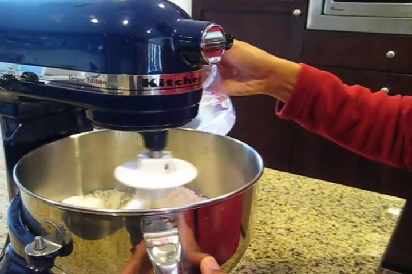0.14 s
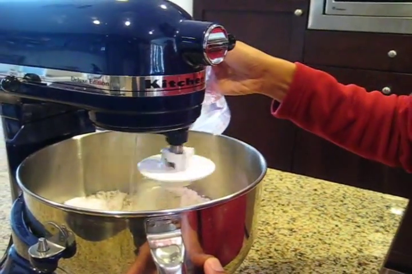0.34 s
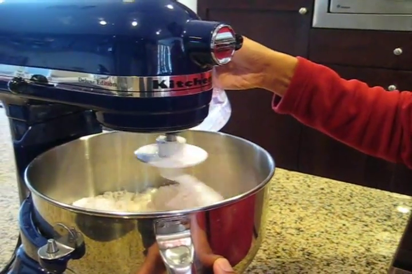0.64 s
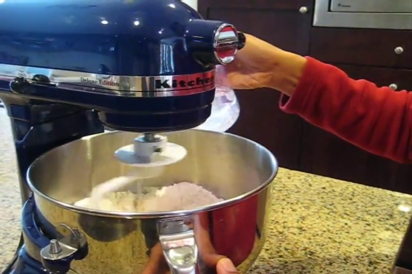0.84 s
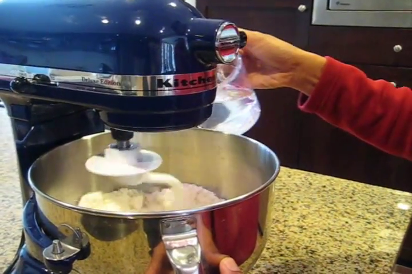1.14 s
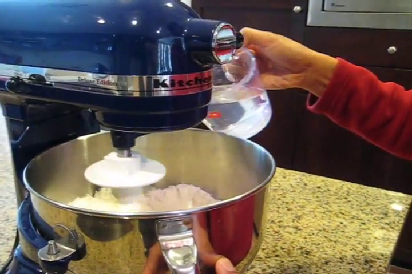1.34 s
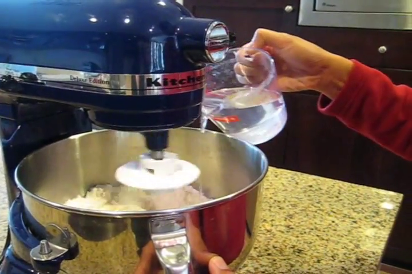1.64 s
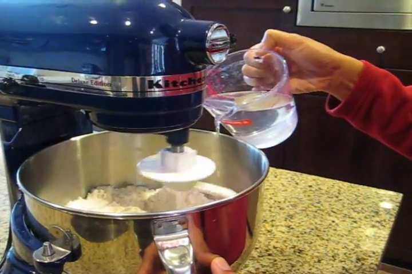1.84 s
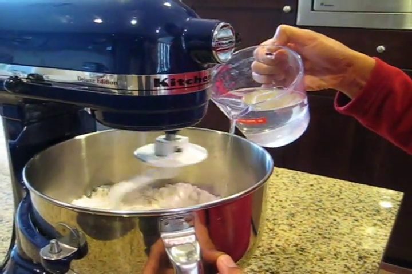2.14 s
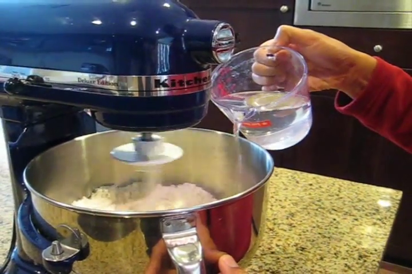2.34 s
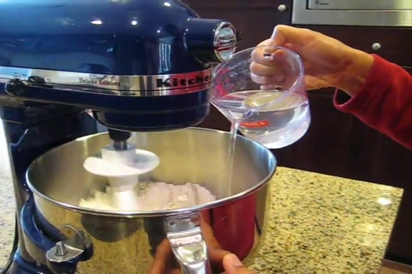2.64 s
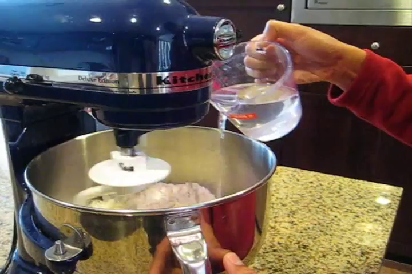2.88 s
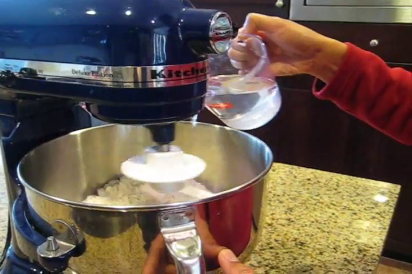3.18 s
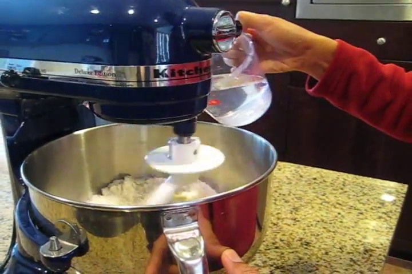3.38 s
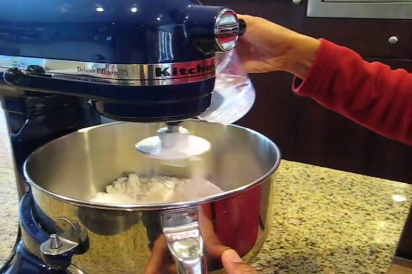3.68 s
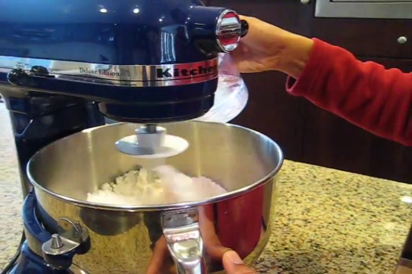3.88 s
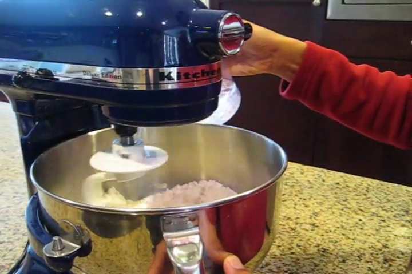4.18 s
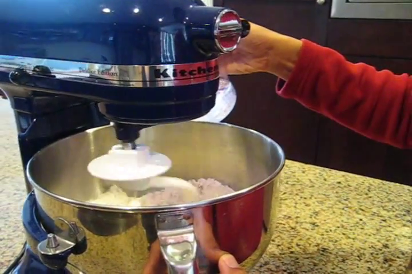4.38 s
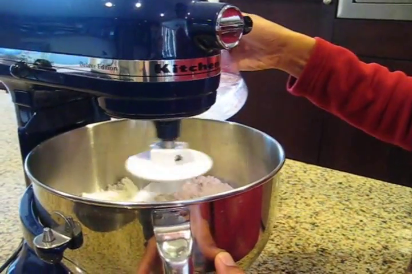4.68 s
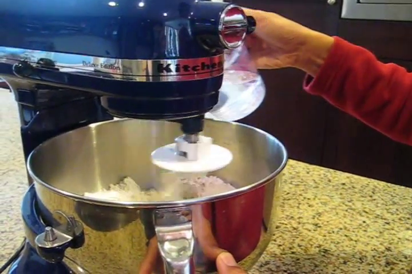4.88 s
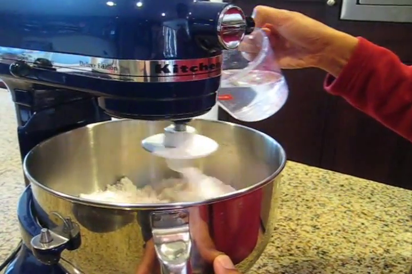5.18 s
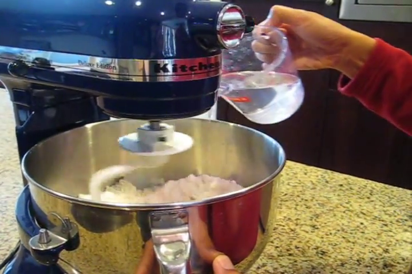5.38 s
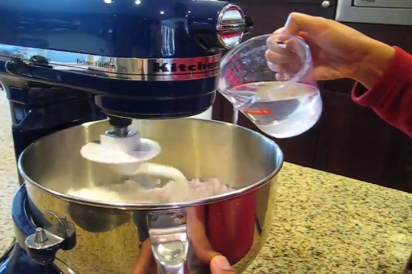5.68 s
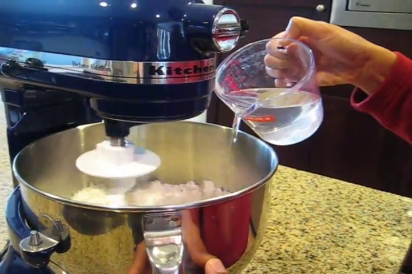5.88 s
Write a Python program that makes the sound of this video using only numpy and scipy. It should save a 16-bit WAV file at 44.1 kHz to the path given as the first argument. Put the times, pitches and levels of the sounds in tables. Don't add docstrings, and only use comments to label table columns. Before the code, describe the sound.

From 0 to about 6 seconds a stand mixer runs without a break, close to the microphone on a kitchen counter. The strongest layer is a bright, scratchy, metallic whine, noisy and ringing at many pitches, from brushes scraping inside the shell. Above it sits a steady airy hiss from the vents. Below, a gear hum near 380 hertz with a fainter octave trembles about six times a second, with grainy gear rattle and soft low rumble. Load shifts gently: a heavier push around 1.3 seconds, with short slips near 1.3, 2.5, 3.5, 5.3 and 5.85, each a tiny flutter in the hum. From about 4.7 seconds the hum becomes slightly stronger and the lower shell ringing slightly duller. Hard walls add a short, faint echo; the very top treble flickers and is cut off. It ends still running.

```python
import sys
import numpy as np
from scipy import signal
from scipy.fft import rfft, irfft, next_fast_len
from scipy.io import wavfile
from scipy.ndimage import uniform_filter1d, map_coordinates

SR = 44100
rng = np.random.default_rng(int(sys.argv[2]) if len(sys.argv) > 2 else 0)


def file_out(sig):
    cols = np.atleast_2d(sig).T
    lim = np.clip(cols, -1, 1)
    pcm = np.round(lim * 32767).astype(np.int16)
    wavfile.write(sys.argv[1], SR, pcm)


def ratio_of_db(decibels):
    return 10 ** (np.asarray(decibels, float) / 20)


N = 265482
T = np.arange(N) / SR

# [order, multiple, level/dB]
SIDE_TONES = [(0, 2, -47), (0, 3, -43), (0, 4, -51), (9, 0, -57), (11, 0, -51), (12, 0, -54), (13, 0, -51),
              (12, -1, -51), (12, 1, -62), (10, 2, -57), (17, 0, -58), (9, 3, -52), (19, 0, -49),
              (21, 0, -52), (25, -1, -54), (23, 0, -58), (32, -1, -48), (33, 0, -43), (42, -1, -49),
              (48, 0, -60), (59, 0, -45), (60, 0, -50), (72, 0, -42), (85, 0, -47), (108, 0, -40.5),
              (75, 0, -49), (137, 0, -43), (116, 0, -47)]
# [f/Hz, width/Hz, level/dB]
BODY_MODES = [(324, 25, -21), (415, 20, -5.5), (484, 35, -10.5), (654, 110, -16), (744, 105, -6.5),
              (858, 25, -8)]
# [f/Hz, width/Hz, level/dB]
GEARBOX_MODES = [(1106, 84, 1.5), (1301, 78, -0.5), (1424, 130, 0), (1515, 96, 2), (1850, 38, -3)]
# [f/Hz, width/Hz, level/dB]
LOWER_SHELL_MODES = [(2045, 24, -12), (2200, 13, -14), (2259, 36, 0.5), (2343, 77, -7.5), (2537, 59, -8),
                     (2666, 25, -3.5), (2745, 29, 1), (2866, 19, -3), (2920, 20, -13), (3057, 92, -15),
                     (3277, 38, -4), (3350, 38, -12), (3660, 28, -3.5)]
# [f/Hz, width/Hz, level/dB]
UPPER_SHELL_MODES = [(3930, 47, -10.5), (4027, 29, -5.5), (4100, 29, -0.5), (4133, 25, -1),
                     (4277, 160, -7.5), (4437, 22, -7), (4530, 41, -7), (4660, 25, -4.5), (4795, 33, -8),
                     (5140, 60, -12), (5248, 85, -3), (5345, 25, -5.5), (5500, 40, -7.5), (5600, 22, -4),
                     (5927, 60, -7.5), (6100, 58, -8.5), (6430, 57, -7), (5620, 16, -13), (6560, 26, -11.5)]
# [f/Hz, width/Hz, level/dB]
VENT_MODES = [(6920, 100, -5), (7050, 60, -3), (7330, 42, 1.5), (7620, 80, -6.5), (8250, 50, -16),
              (8360, 65, -6.5), (8800, 49, -8), (9300, 66, -4), (10030, 82, -3), (10760, 90, -3),
              (10700, 50, -10), (11070, 80, -0.5), (11400, 54, -1), (11530, 88, -9.5), (12422, 150, -19),
              (12685, 45, -16)]
# [f/Hz, level/dB]
RUMBLE_COLOR = [(20, -38), (100, -33.5), (180, -31.5), (260, -22.5), (400, -21.5), (560, -24), (900, -29.5),
                (1100, -56)]
# [f/Hz, level/dB]
RATTLE_COLOR = [(700, -24), (950, -11.5), (1200, -4), (1500, -3), (1750, -6), (2000, -17.5), (2400, -37)]
# [f/Hz, level/dB]
SCRAPE_COLOR = [(1700, -33), (2000, -16), (2500, -15.5), (3000, -12), (3500, -12.5), (3900, -27)]
# [f/Hz, level/dB]
WHINE_COLOR = [(3300, -38), (3700, -15.5), (4400, -11), (5300, -7.5), (6200, -14.5), (6800, -49)]
# [f/Hz, level/dB]
HISS_COLOR = [(5800, -22), (6500, -5), (7500, -7), (8500, -11), (11000, -12.5), (12000, -16), (13500, -20),
              (15500, -19)]
# [f/Hz, share of the time 0..1]
TREBLE_SHARE = [(11500, 1), (11900, .93), (12300, .99), (13000, .93), (13600, .62), (14000, .36),
                (14400, .22), (14700, .13), (14850, .01), (15050, .05), (15400, .03)]
# [turning f/Hz, load level/dB, load phase/rad,
# tooth-rate swing/Hz, swing phase/rad]
SHAFTS = [(6.355, 0.64, 0.66, 1.16, -0.17), (2.196, 1.01, -3.16, 0.5, 0.99), (1.42, 0.76, 3.79, 0.5, 0.67),
          (4.437, 0.28, -2.7, 0.42, 1.24)]
# [t/s, tooth-rate jump/Hz, lost level/dB]
SLIPS = [(0.102, -0.3, 2.5), (0.211, 0.9, 3.1), (0.358, 2.4, 4.3), (0.564, -3.4, 2.6), (0.815, 0.8, 3.7),
         (1.162, -1.9, -1.0), (1.313, 4.6, 6.2), (1.552, -2.7, 4.9), (1.771, 1.8, 5.0), (2.34, -2.8, 3.5),
         (2.534, 4.1, 6.3), (2.91, -2.7, -3.3), (3.141, 3.4, 3.3), (3.495, 0.7, 6.7), (3.577, 2.8, 2.2),
         (4.22, 3.8, 2.0), (4.494, 3.0, 2.3), (5.046, 1.7, 5.9), (5.337, 2.1, 6.5), (5.851, 3.6, 7.9)]
# [t/s, load level/dB]
DOUGH_DRAG = [(0, -1.5), (.3, -1.34), (.69, 0.64), (.9, -0.26), (1.27, 4), (1.44, -2.5), (1.7, 1.11),
              (2.19, -0.83), (2.76, 1.18), (2.93, -2.5), (3.3, 2), (3.6, -0.25), (4.1, .5), (4.4, 1.05),
              (4.89, -1), (5.18, .5), (5.81, 1.84), (6.02, -2)]

TEETH, BARS, REDUCTION = 10, 24, 6
MAINS_HZ, TOOTH_HZ, IDLER_HZ = 120.05, 382.4, 5.24
SLIP_S, SAG_HZ_PER_DB = .022, .21
STIFFENS_S, STIFFEN_LEN_S = 4.7, 0.14
STIFF_HUM_DB, STIFF_SHELL_DB = 1.2, -.7
HUM_DB, SECOND_DB, RATTLE_DB, LOWER_DB, UPPER_DB, HISS_DB = -28, -35.5, -30, -27, -20.5, -25.5
HUM_PER_LOAD, RATTLE_PER_LOAD, SHELL_PER_DRAG = .12, .18, .15
WHEEL_HUM_DB, IDLER_RATTLE_DB = .49, .8


def unit(x):
    return x / np.sqrt(np.mean(x ** 2) + 1e-20)


def wobble(rate):
    coarse = T[::64]
    values = rng.standard_normal(int(N * rate / SR) + 4)
    return np.interp(T, coarse, map_coordinates(values, [coarse * rate]))


def ring(x, color, modes, lift_db, skew):
    size = next_fast_len(N + SR // 2)
    f = np.fft.rfftfreq(size, 1 / SR)
    hz, db = np.transpose(color)
    broad_db = np.interp(np.log(f + 1), np.log(hz), db, left=-120, right=-120)
    response = ratio_of_db(broad_db).astype(complex)
    for center, width, level_db in modes:
        near = slice(*np.searchsorted(f, [center * .8, center * 1.25]))
        fn = f[near]
        mode = 1j * fn * width / (center * center - fn ** 2 + 1j * fn * width)
        window = np.exp(-(np.log(fn / center) / 0.087) ** 2 - 1j * skew)
        response[near] += ratio_of_db(level_db + lift_db) * mode * window
    return unit(irfft(rfft(x, size) * response, size)[:N])


def brushing(turns, repeat, uneven_db, runout_db, slot_db, bar_db, mains_db):
    track = unit(irfft(np.exp(2j * np.pi * rng.uniform(0, 1, 513))))
    shaken = turns + .0022 * wobble(25) + 0.0013 * np.sin(2 * np.pi * MAINS_HZ * T)
    again = map_coordinates(track, [shaken % 1 * len(track)], mode="grid-wrap")
    bar_wear = unit(rng.standard_normal(BARS))
    wear = map_coordinates(bar_wear, [turns * BARS % BARS], mode="grid-wrap", order=1)
    angle = 2 * np.pi * turns
    beat = runout_db * np.cos(angle) + slot_db * np.cos(angle * BARS / 2) + bar_db * np.cos(angle * BARS)
    chop = mains_db * np.cos(2 * np.pi * MAINS_HZ * T)
    scrape = np.sqrt(repeat) * again + np.sqrt(1 - repeat) * rng.standard_normal(N)
    return ratio_of_db(uneven_db * wear + beat + chop) * scrape


def kitchen(x, wet_db, t60, drift_db):
    length = SR // 3
    tail = rng.standard_normal(length) * ratio_of_db(-60 * T[:length] / t60)
    late = np.pad(x, (150, 0))
    x = x + ratio_of_db(wet_db) * signal.fftconvolve(late, tail / np.linalg.norm(tail))[:N]
    z = signal.stft(x, nperseg=1024)[2]
    shade = uniform_filter1d(rng.standard_normal(z.shape), size=5, axis=0)
    shade = uniform_filter1d(shade, size=50, axis=1)
    return signal.istft(z * ratio_of_db(drift_db * unit(shade)), nperseg=1024)[1][:N]


def counter():
    rumble = ring(rng.standard_normal(N), RUMBLE_COLOR, BODY_MODES, lift_db=-7.5, skew=.2)
    return ratio_of_db(-38.5 + 0.39 * wobble(5.17)) * rumble


def vents(turns, hiss_db):
    air = brushing(turns, 0.17, 0.42, 0.97, 0.46, 0.37, .2) * ratio_of_db(0.13 * wobble(10))
    return ratio_of_db(hiss_db) * ring(air, HISS_COLOR, VENT_MODES, lift_db=-6.0, skew=0.2)


def housing(turns, lower_db, upper_db):
    low_scrape = brushing(turns, .5, 0.76, 0.11, 0.61, 0.55, 0.16)
    lower = ring(low_scrape, SCRAPE_COLOR, LOWER_SHELL_MODES, lift_db=-4.5, skew=0.64)
    high_scrape = brushing(turns, .5, 0.48, 0.13, .4, 0.3, 0.13)
    upper = ring(high_scrape, WHINE_COLOR, UPPER_SHELL_MODES, lift_db=-2.0, skew=0.37)
    return ratio_of_db(lower_db) * lower + ratio_of_db(upper_db) * upper


def gears(turns, rattle_db):
    lumps = 1.15 * np.cos(2 * np.pi * turns / REDUCTION + 1.6)
    lumps += 1.2 * np.cos(2 * np.pi * turns * TEETH)
    unsteady = 0.31 * wobble(25) + 1.3 * wobble(60)
    loose = ratio_of_db(lumps + unsteady) * brushing(turns, 0.1, 0.9, 0.23, .1, .1, .15)
    return ratio_of_db(rattle_db) * ring(loose, RATTLE_COLOR, GEARBOX_MODES, lift_db=-4, skew=0.55)


def hum(mesh, turns, hum_db, second_db):
    slack = .16 * wobble(28)
    tone = ratio_of_db(hum_db + 2.5 + 0.45 * wobble(25)) * np.sin(2 * np.pi * mesh + slack)
    octave_phase = 4 * np.pi * mesh + 2 * slack - 1.57 + .2 * wobble(30)
    tone += ratio_of_db(second_db + 2.8 + .7 * wobble(30)) * np.sin(octave_phase)
    for order, multiple, db in SIDE_TONES:
        drift = .009 * order * wobble(14) + rng.uniform(0, 2 * np.pi)
        cycles = order * turns + multiple * MAINS_HZ * T
        tone += ratio_of_db(db + 1.5 * wobble(7)) * np.sin(2 * np.pi * cycles + drift)
    return np.sqrt(2) * tone


def drive():
    drag_db = np.interp(T, *np.transpose(DOUGH_DRAG))
    load_db = drag_db
    tooth_hz = TOOTH_HZ - SAG_HZ_PER_DB * drag_db
    for hz, db, load_phase, swing_hz, swing_phase in SHAFTS:
        angle = 2 * np.pi * hz * T
        load_db = load_db + db * np.cos(angle + load_phase)
        tooth_hz = tooth_hz + swing_hz * np.cos(angle + swing_phase)
    contact_db = load_db
    for s, jump_hz, lost_db in SLIPS:
        slip = np.exp(-((T - s) / SLIP_S) ** 2 / 2)
        tooth_hz = tooth_hz + jump_hz * slip
        contact_db = contact_db - lost_db * slip
    return tooth_hz, drag_db, load_db, contact_db


def scene():
    tooth_hz, drag_db, load_db, contact_db = drive()
    turns = np.cumsum(uniform_filter1d(tooth_hz, size=6918)) / SR / TEETH
    mesh = np.cumsum(tooth_hz) / SR
    stiff = 1 / (1 + np.exp((STIFFENS_S - T) / STIFFEN_LEN_S))
    wheel = np.cos(2 * np.pi * turns / REDUCTION + .55)
    idler = np.cos(2 * np.pi * IDLER_HZ * T - .89)
    hum_db = HUM_DB + HUM_PER_LOAD * contact_db + STIFF_HUM_DB * stiff + WHEEL_HUM_DB * wheel
    rattle_db = RATTLE_DB + RATTLE_PER_LOAD * load_db + IDLER_RATTLE_DB * idler
    lower_db = LOWER_DB + SHELL_PER_DRAG * drag_db + STIFF_SHELL_DB * stiff
    motor = counter() + vents(turns, HISS_DB)
    motor += housing(turns, lower_db, UPPER_DB) + gears(turns, rattle_db)
    room = ratio_of_db(.4 * wobble(22)) * kitchen(motor, wet_db=-15, t60=.35, drift_db=.65)
    return (room + hum(mesh, turns, hum_db, SECOND_DB + contact_db))[None]


def patchy_treble(x):
    hz, _, z = signal.stft(x, SR, nperseg=3072, noverlap=2048)
    luck = rng.uniform(0, 1, (len(hz) // 6 + 1, z.shape[-1] // 4 + 1))
    luck = np.repeat(np.repeat(luck, 6, axis=0), 4, axis=1)
    luck = luck[:len(hz), :z.shape[-1]]
    keep = luck < np.interp(hz, *np.transpose(TREBLE_SHARE))[:, None]
    return signal.istft(z * keep, SR, nperseg=3072, noverlap=2048)[1][:, :N]


def top_cut(x):
    return signal.sosfilt(signal.butter(12, 15190, fs=SR, output="sos"), x)


def record(dry):
    mix = patchy_treble(dry)
    return top_cut(mix)


dry = scene()
out = record(dry)
file_out(out)
```